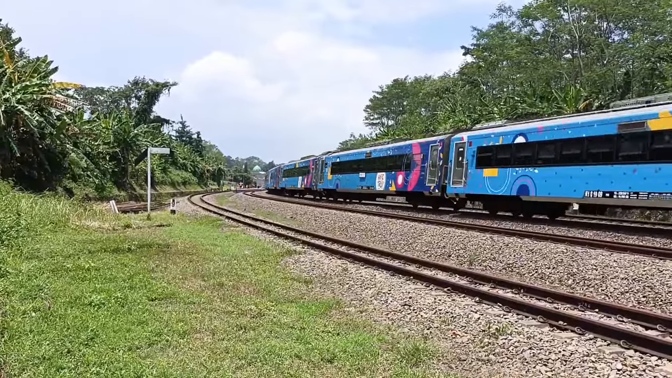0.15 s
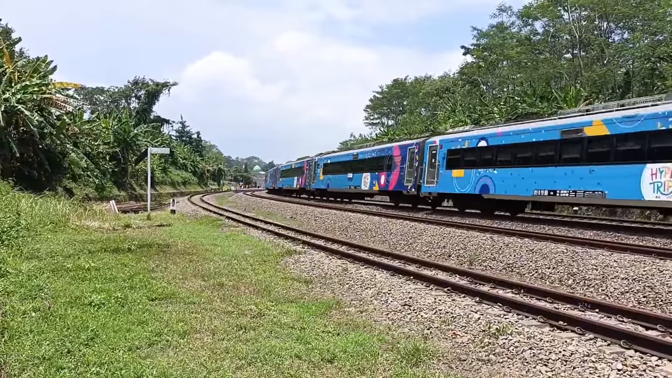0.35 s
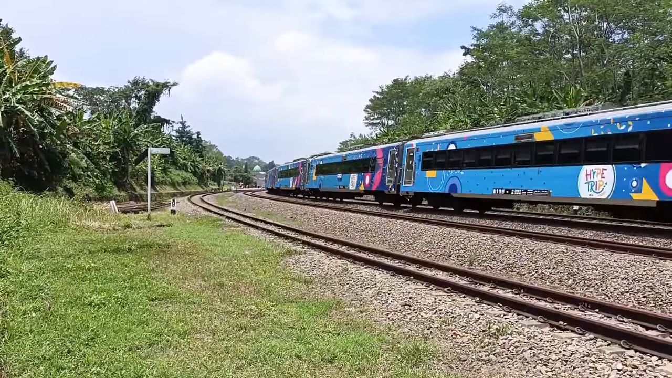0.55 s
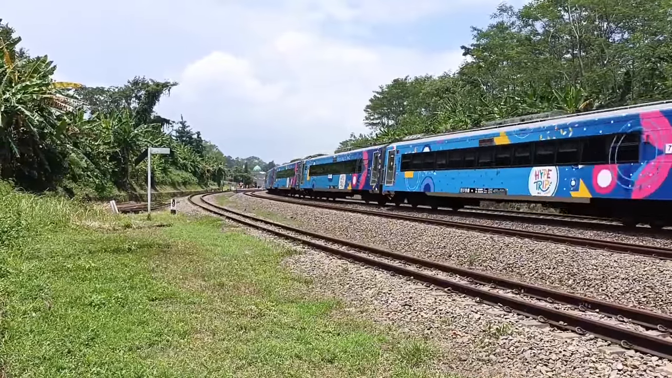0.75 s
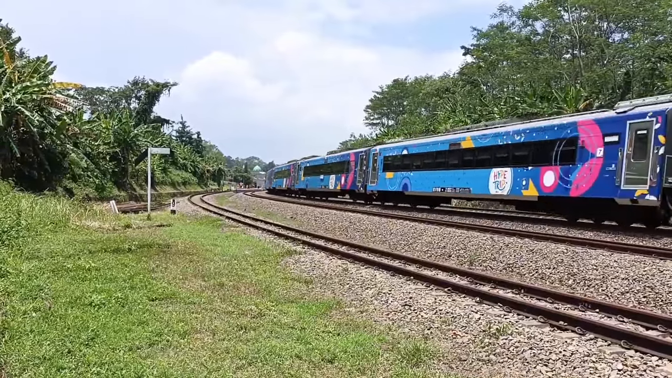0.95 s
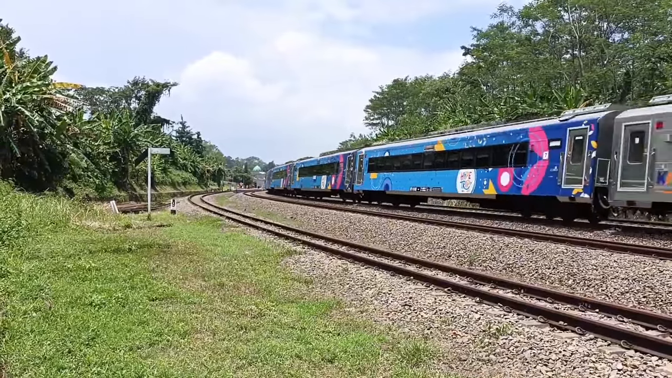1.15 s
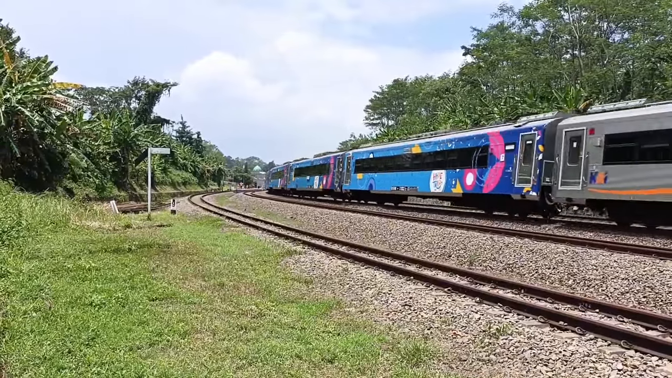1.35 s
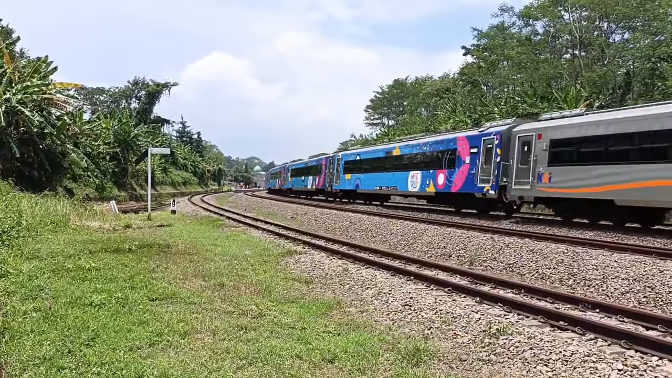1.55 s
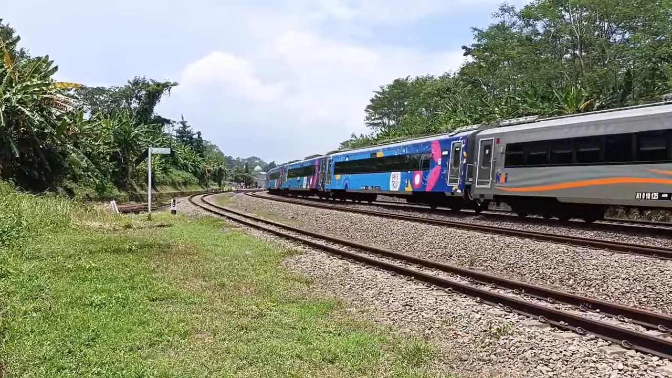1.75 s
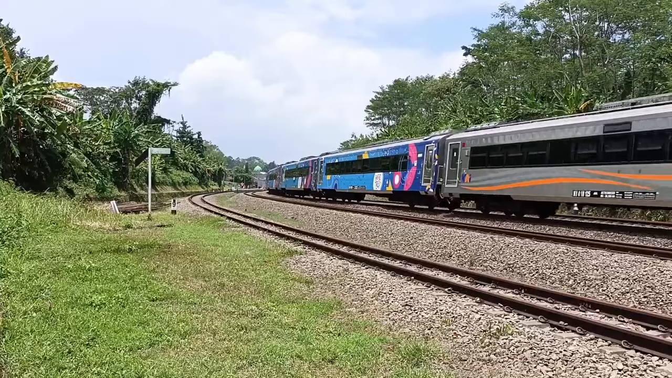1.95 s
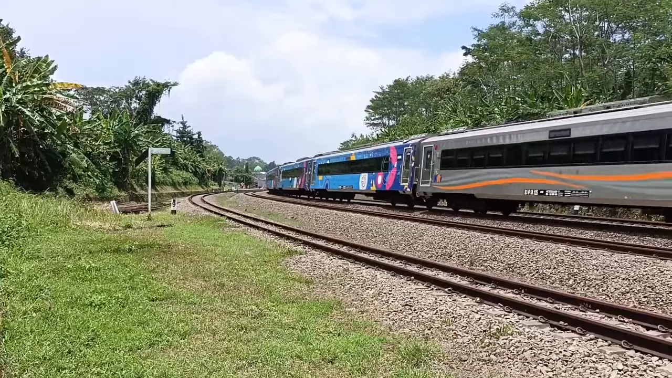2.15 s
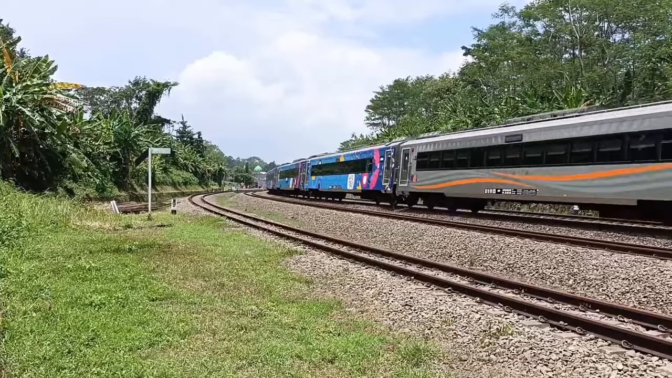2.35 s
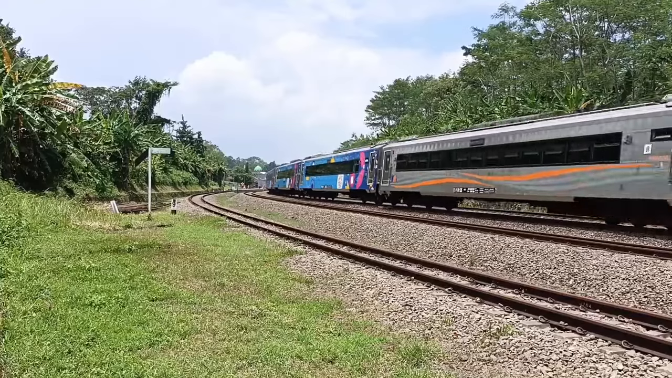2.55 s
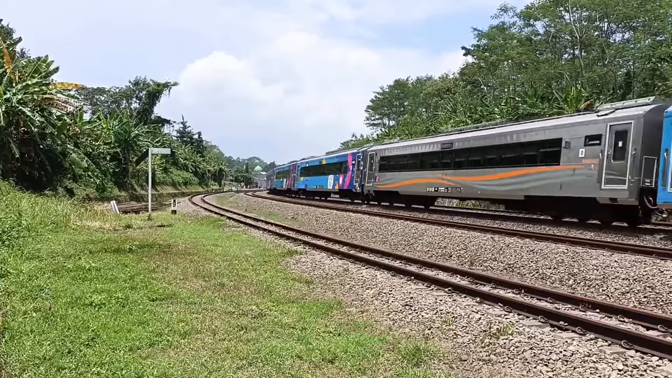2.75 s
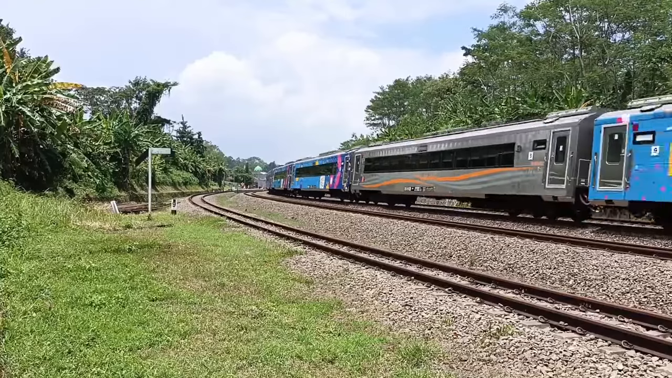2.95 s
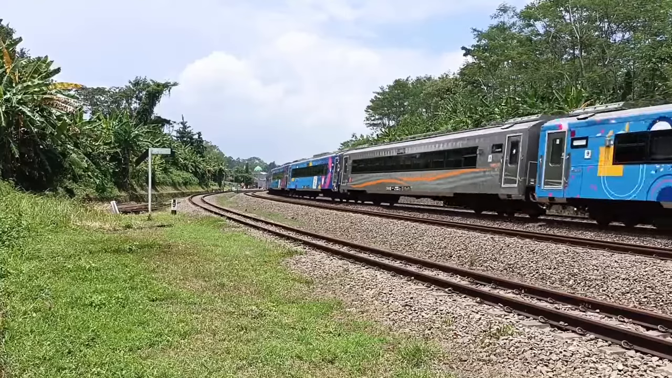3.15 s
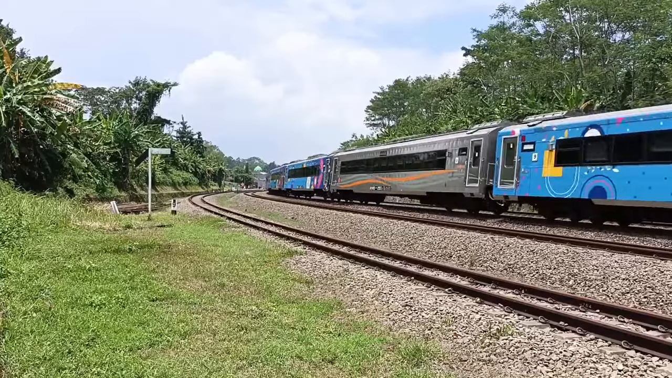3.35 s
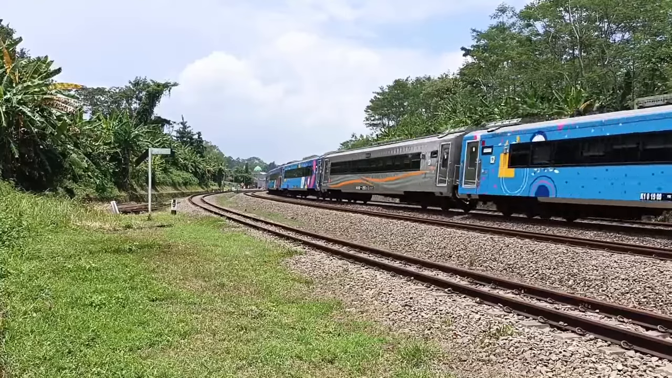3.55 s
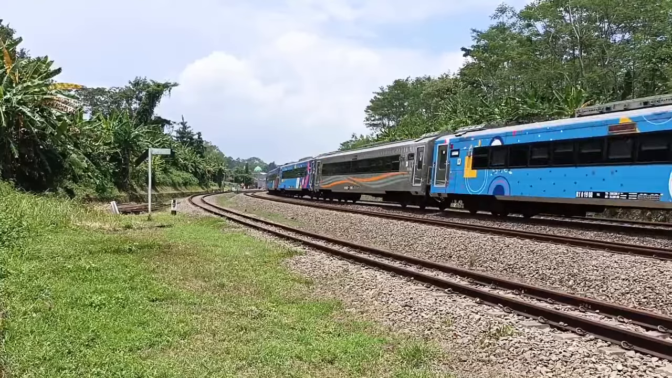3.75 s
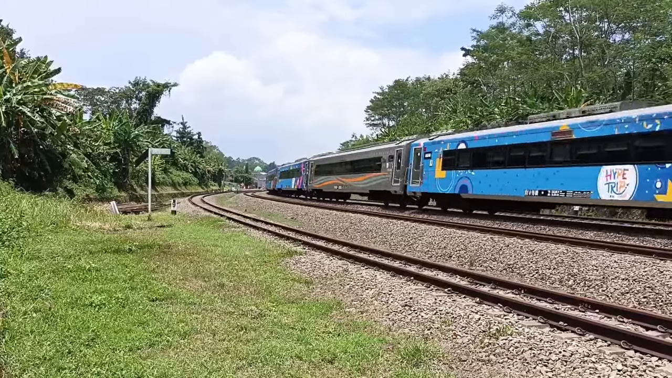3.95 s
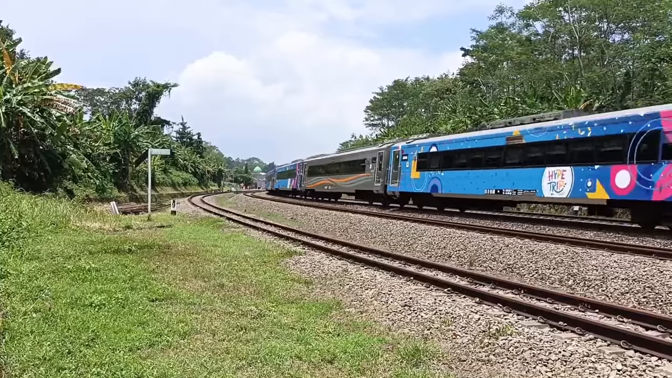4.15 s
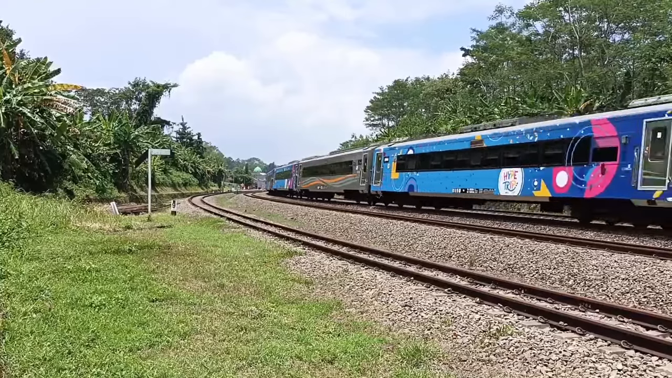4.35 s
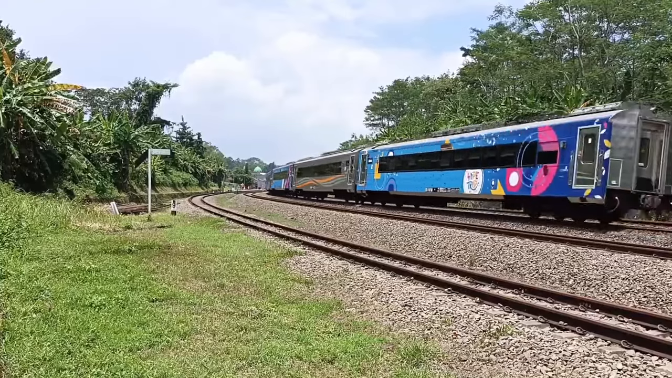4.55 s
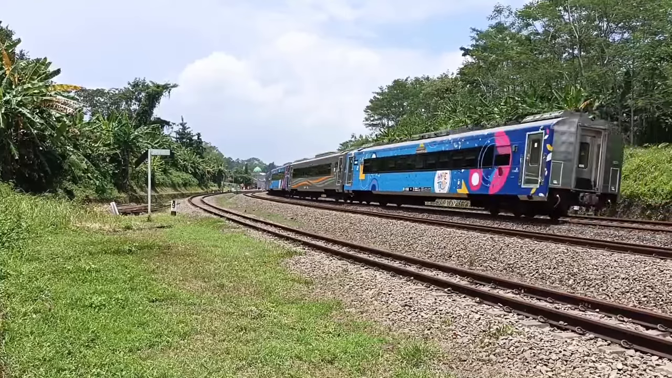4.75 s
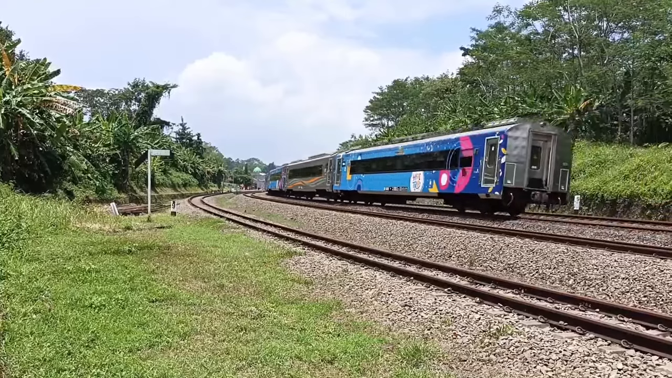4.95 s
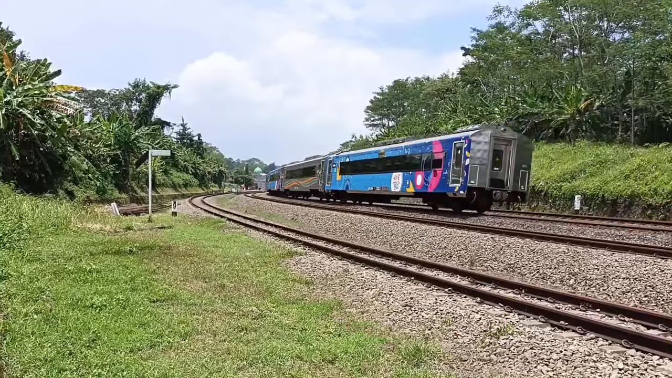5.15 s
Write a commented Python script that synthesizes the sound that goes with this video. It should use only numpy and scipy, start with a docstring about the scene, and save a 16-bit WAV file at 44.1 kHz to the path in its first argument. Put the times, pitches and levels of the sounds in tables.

```python
"""The last coaches of a passenger train roll away round a curve in open country.
First comes a jolting rumble with slack gear knocking; axles, two to a bogie, then clack over a joint.
Flanges hiss and bite, and a high squeal starts strong over a departing wheel's cry.
Mid-way a near squeal slides down in pitch, a wheel rings in bursts and flanges whistle.
At the end the last bogie's roar swells and sinks while the fluttering squeal thins out."""
import sys
import numpy as np
from scipy import signal
from scipy.fft import rfft, irfft
from scipy.io import wavfile
from scipy.ndimage import uniform_filter1d, minimum_filter1d, map_coordinates

SR = 44100
rng = np.random.default_rng(int(sys.argv[2]) if len(sys.argv) > 2 else 0)


def unload_wav(signal):
    """Save mono or channel-first audio to the path in sys.argv[1] as 16-bit WAV at rate SR, clipped to [-1, 1]."""
    wavfile.write(
        sys.argv[1],
        SR,
        np.round(np.clip(np.atleast_2d(signal).T, -1, 1) * 32767).astype(np.int16),
    )


N = 228800

# Rolling, loudest as bogies pass: t/s, rumble level/dB, rail roar level/dB
ROLLING_LEVELS = [(0, -28, -35.5), (0.17, -20.5, -25), (0.6, -19, -20.5), (1.0, -25, -32.5),
                  (1.3, -25.5, -28), (1.52, -20.5, -27.5), (1.78, -27.5, -38), (2.1, -26, -33.5),
                  (2.32, -29, -40), (2.52, -27, -37.5), (2.88, -24.5, -33.5), (3.1, -24.5, -29),
                  (3.45, -29, -38), (3.62, -37.5, -50.5), (3.88, -36, -47), (4.08, -38, -46),
                  (4.18, -33, -38.5), (4.8, -32.5, -40), (5.01, -45, -44.5)]
# Colour of the rumble: f/Hz, density/(dB per Hz)
RUMBLE_COLOUR = [(30, -61), (70, -34), (95, -5), (125, -1), (175, -5.5), (245, 1.5), (300, -3.5),
                 (360, -2.5), (430, -15.5), (1200, -108)]
# Colour of the rail roar: f/Hz, density/(dB per Hz)
ROAR_COLOUR = [(300, -45), (430, -3), (570, 2), (690, -3.5), (900, -6), (1200, -11), (4000, -31)]
# Falling pitch of the rail roar: t/s, pitch ratio
ROAR_DOPPLER = [(0, 1.02), (5.19, .94)]
# The last bogie, heard from behind: t/s, level/dB
REAR_LEVEL = [(4.05, -43.5), (4.22, -37), (4.62, -32), (4.9, -39.5), (5.01, -60)]
# Its colour: f/Hz, density/(dB per Hz)
REAR_COLOUR = [(300, -27), (410, -3), (530, 5.5), (680, -12.5), (1120, -14.5), (1400, -4.5), (1700, -21),
               (2200, -9), (2800, -31)]

# Colour of loose gear and grit: f/Hz, density/(dB per Hz)
RATTLE_COLOUR = [(400, -6), (750, -6), (1120, 0), (1400, 4.5), (2500, -1.5), (3700, -7.5), (5000, -18.5),
                 (9000, -33)]
RATTLE_DB, RATTLE_FOLLOWS = 2.5, 1.253   # level/dB at a roar of 0 dB, share of the roar's dB swing
# Taps per second over all parts, their spread either way/dB, ring time to -60 dB/s
RATTLE_PER_S, RATTLE_SPREAD_DB, RATTLE_T60_S = 260, 5, .045

# Axles drop into a joint: t/s, sleeper thump level/dB, bogie boom level/dB, rail clank level/dB
AXLE_DROPS = [(0.447, -6.5, -11, -10.5), (0.622, -12, -12.5, -19), (1.035, -31, -36, -21.5),
              (1.214, -28, -12.5, -17.5), (1.888, -41, -17.5, -29), (2.068, -31, -23, -31.5),
              (2.204, -16.5, -23.5, -19.5), (2.392, -25, -19, -21.5), (2.782, -13, -14.5, -17),
              (2.963, -44, -16, -20), (3.924, -21.5, -27, -26.5), (4.106, -29, -23.5, -29.5),
              (4.606, -33, -27.5, -35), (5.054, -20.5, -38.5, -35)]
# Modes an axle sets ringing: pitch, wander of the pitch
SLEEPER_HZ, SLEEPER_WANDER_HZ = 122, 24.1
BOGIE_HZ, BOGIE_WANDER_HZ = 252, 37.9
RAIL_HZ, RAIL_WANDER_HZ = 570, 36
# Higher rail modes, against the lowest one: f/Hz, level/dB
UPPER_RAIL_MODES = [(1050, -3), (1470, -7)]
# Dull crunch of the ballast: f/Hz, density/(dB per Hz)
THUD_COLOUR = [(30, -46), (65, -50), (110, 11.5), (260, 1.5), (350, 8.5), (1000, -25)]
# Loose steel at the joint: f/Hz, density/(dB per Hz)
CLATTER_COLOUR = [(200, -35), (400, 3), (680, 2), (1070, -4), (1800, -4.5), (2100, -2.5), (7000, -35)]
THUD_DB, CLATTER_DB = -5.5, 2   # crunch against the tone it joins; loose steel against the lowest rail mode
LANDING_S, LANDING_DB = .017, -1   # delay and level of the landing on the next rail end, against the drop
HITS_THINNED_BELOW_HZ = 89   # thumps and knocks are thinned below this pitch
# Dull knocks of springs and couplers: t/s, level/dB
KNOCKS = [(0.032, -17), (0.135, -13), (0.247, -13.5), (0.512, -11), (.722, -19), (1.487, -19), (2.737, -25),
          (2.852, -36)]

# Flange hiss before HISS_DB is added: t/s, level/dB
GRIND_LEVEL = [(0, -39), (0.25, -48), (0.6, -31.5), (1.0, -39), (1.35, -30), (2.15, -34), (3.25, -31.5),
               (4.05, -37), (4.33, -32), (5.19, -32)]
# Colour of the hiss: f/Hz, density/(dB per Hz)
HISS_COLOUR = [(2400, -8), (3900, 6), (4500, -6), (5000, -2), (7250, -1), (8500, -1), (9800, 10.5),
               (11400, 0.5), (13300, 12)]
# Resonances of the wheel discs: f/Hz, relative level/dB
WHEEL_BODY_MODES = [(1390, -5), (1720, -1.5), (2100, 6), (2520, -4.5), (3070, -4), (3680, -6.5),
                    (3970, -8.5)]
# A flange bites: peak t/s, wheel body level/dB, hiss level/dB, time to half power/s
FLANGE_BITES = [(1.59, -27, -21, 0.047), (1.83, -32.5, -21.5, 0.012), (2.61, -28, -20, 0.022),
                (3.15, -37, -24, 0.07), (3.40, -33, -23.5, 0.063), (3.79, -39.5, -27.5, 0.081),
                (4.331, -33, -24, 0.01), (4.508, -30.5, -46, 0.023), (4.77, -31, -28.5, 0.044)]
HISS_DB, WHEEL_WIDTH_HZ = 5, 125
BODY_DB, BODY_FOLLOWS = -13.5, 0.62   # level/dB at a roar of 0 dB, share of the roar's dB swing

# High squeal before UPPER_DB and LOWER_DB are added: t/s, upper modes level/dB, lower modes level/dB
SQUEAL_LEVELS = [(0, -22, -18), (0.4, -17, -27), (0.9, -15.5, -14.5), (1.65, -23, -29), (2.0, -26, -19),
                 (2.8, -23, -42), (3.25, -24, -24), (3.98, -36, -33), (4.5, -32, -27), (5.19, -40, -30)]
# Upper wheel modes: f/Hz, width/Hz, relative level/dB
UPPER_MODES = [(15385, 8, 0), (15565, 14, -10), (15480, 170, -9)]
# Lower wheel modes: f/Hz, width/Hz, relative level/dB
LOWER_MODES = [(14388, 12, 3), (14567, 10, -11), (14350, 170, -1)]
# The upper modes flare up: peak t/s, level/dB, time to half power/s
UPPER_FLARES = [(.31, -14, 0.014), (2.31, -14, 0.045), (3.26, -10, 0.03)]
# Colour of the sizzle: f/Hz, density/(dB per Hz)
SIZZLE_COLOUR = [(12000, -28), (13750, -10), (14080, 0), (14800, 0), (15400, 6), (15720, 6), (15900, -8)]
UPPER_DB, LOWER_DB, SIZZLE_DB = 9, 3, -33.5

# A squealing wheel passes and its pitch falls: t/s, f/Hz
PASSING_PITCH = [(1.1, 15810), (1.72, 15630), (2.49, 15309), (3.0, 15150), (3.7, 15020)]
PASSING_S, PASSING_DB, PASSING_HALF_S = 2.16, -9, 0.45   # peak t/s, level/dB, time to half power/s
# A wheel that has already gone by: t/s, f/Hz, level/dB
LEAVING_WHEEL = [(0, 14390, -18), (.65, 14120, -35), (1.3, 14030, -30.5), (3.1, 14015, -41)]

# The ringing wheel: f/Hz, width/Hz, relative level/dB
RING_MODES = [(3031, 10, 0), (3025, 90, -4.5)]
# It binds and sings harder: peak t/s, level/dB, time to half power/s
RING_BINDS = [(1.96, -30, 0.055), (2.411, -25, 0.022), (2.585, -22, 0.024), (2.69, -29.5, 0.012),
              (2.93, -31, 0.0067), (3.04, -26.5, 0.039)]
# Its bending pitch: t/s, pitch ratio
RING_DOPPLER = [(1.75, 1.016), (2.02, 1.005), (2.17, 1.017), (2.55, .999)]
RING_S, RING_DB, RING_HALF_S = 2.6, -33, 0.43   # peak t/s, level/dB, time to half power/s
RING_WAVER, RING_FLUTTER_DB = .0027, 2   # share of its pitch; swing of its level/dB

# Flange whistles and rougher cries: start t/s, end t/s, f/Hz, width/Hz, peak level/dB
WHISTLES = [(1.25, 1.5, 9815, 10, -33), (1.5, 2.08, 10362, 14, -36), (2.45, 3.4, 2030, 36, -32.5),
            (2.59, 2.68, 2930, 30, -31), (3.1, 3.28, 3975, 25, -39), (3.68, 3.86, 2950, 220, -39),
            (3.0, 5.4, 13263, 14, -38)]
WHISTLE_WAVER_HZ = 14

# Likeness of the two ears: f/Hz, left-right correlation
LIKENESS = [(60, 1), (550, 0.9), (1200, 0.3), (8000, 0.033)]
# Lead of the left ear: t/s, lead/samples
LEFT_LEAD = [(2, 19), (3, 14), (4.2, 13), (5.19, 5)]
TRACK_LEAD = 0.85   # share of that lead for track noise, which comes from further along the line
# Colour of each microphone port: f/Hz, left level/dB, right level/dB
PORT_COLOUR = [(720, 0.5, 0.5), (1170, -5, -0.5), (2480, 0, -1), (3660, 0.5, 6), (4980, 8, 3),
               (7590, 4.5, 8), (10100, 3.5, -20), (14000, 1, -8)]
CUTOFF_HZ = 15780


def rolling():
    """Rough treads shake sleepers and rails in uneven jolts; the last bogie's roar swells late."""
    rumble_db, roar_db = in_time(ROLLING_LEVELS)
    jolts_db = 2 * drift(rate_hz=18)
    rumble = shaken(RUMBLE_COLOUR) * from_db(rumble_db + jolts_db)
    roar = patchy(bent_pitch(shaken(ROAR_COLOUR), ROAR_DOPPLER), depth_db=3.5)
    roar = roar * from_db(roar_db + jolts_db / 2)
    rear_db = in_time(REAR_LEVEL)[0] + jolts_db / 2
    rear = patchy(rattled(REAR_COLOUR), depth_db=2) * from_db(rear_db)
    return rumble + roar + rear


def rattle():
    """Loose brake gear and grit under the treads give the roar a coarse grain."""
    roar_db = in_time(ROLLING_LEVELS)[1]
    return rattled(RATTLE_COLOUR) * from_db(RATTLE_DB + RATTLE_FOLLOWS * roar_db)


def joint():
    """Each axle drops and lands: sleeper thumps, bogie booms, rail clanks, loose steel clatters."""
    s, thump_db, boom_db, clank_db = np.transpose(AXLE_DROPS)
    thump = wavering(SLEEPER_HZ, SLEEPER_WANDER_HZ) * blows(s, thump_db, rise_s=0.018, t60=0.093)
    bogie = wavering(BOGIE_HZ, BOGIE_WANDER_HZ) + from_db(THUD_DB) * shaken(THUD_COLOUR)
    boom = bogie * blows(s, boom_db, rise_s=0.009, t60=0.3)
    rail = wavering(RAIL_HZ, RAIL_WANDER_HZ)
    for hz, db in UPPER_RAIL_MODES:
        rail = rail + from_db(db) * wavering(hz, RAIL_WANDER_HZ)
    steel = rail + from_db(CLATTER_DB) * rattled(CLATTER_COLOUR)
    strike_s = np.r_[s, s + LANDING_S]
    strike_db = np.r_[clank_db, clank_db + LANDING_DB]
    return thump + boom + steel * blows(strike_s, strike_db, rise_s=0.011, t60=0.12)


def knocks():
    """Slack running gear bumps with a short, low note."""
    s, db = np.transpose(KNOCKS)
    note = wavering(SLEEPER_HZ, SLEEPER_WANDER_HZ) + from_db(THUD_DB) * shaken(THUD_COLOUR)
    return note * blows(s, db, rise_s=0.014, t60=0.034)


def flanges():
    """Flanges rub the outer rail and bite now and then; the wheel discs colour the scrape."""
    roar_db, hiss_db = in_time(ROLLING_LEVELS)[1], in_time(GRIND_LEVEL)[0]
    s, bite_body_db, bite_hiss_db, half_s = np.transpose(FLANGE_BITES)
    body_level = with_swells(from_db(BODY_DB + BODY_FOLLOWS * roar_db), zip(s, bite_body_db, half_s))
    hiss_level = with_swells(from_db(HISS_DB + hiss_db), zip(s, bite_hiss_db, half_s))
    chatter_db = drift(rate_hz=20)
    discs = rubbed([(hz, WHEEL_WIDTH_HZ, db) for hz, db in WHEEL_BODY_MODES])
    body = patchy(discs, depth_db=3.0) * body_level * from_db(1.63 * chatter_db)
    hiss = patchy(shaken(HISS_COLOUR), depth_db=4.0) * hiss_level * from_db(chatter_db)
    return body + hiss


def near_wheels():
    """One squealing wheel swells and fades as it passes; another is already leaving."""
    passing = passing_wheel(in_time(PASSING_PITCH)[0]) * swell(PASSING_S, PASSING_DB, PASSING_HALF_S)
    leaving_hz, leaving_db = in_time(LEAVING_WHEEL)
    return passing + passing_wheel(leaving_hz) * from_db(leaving_db)


def passing_wheel(hz):
    """A squeal follows a pitch curve; its paths off ballast and coach interfere and flutter."""
    carrier = np.exp(2j * np.pi * np.cumsum(hz) / SR)
    paths = np.array([drift(rate_hz=26) + 1j * drift(rate_hz=26) for path in range(3)])
    ears = paths[0] + paths[1:] / 2   # one path shared, one more for each ear
    throb_db = 2 * drift(rate_hz=9)
    return rms_one((ears * carrier).real * from_db(throb_db))


def ringing_wheel():
    """One wheel rings in a low mode as it goes by, wavering, in bursts where it binds in the curve."""
    flutter = rms_one(from_db(RING_FLUTTER_DB * drift(rate_hz=22)))
    level = with_swells(swell(RING_S, RING_DB, RING_HALF_S), RING_BINDS) * flutter
    ring = squealing(RING_MODES, steadiness=0.65)
    return bent_pitch(ring, RING_DOPPLER, RING_WAVER * drift(rate_hz=14)) * level


def whistles():
    """A flange catches and one wheel mode swells, wavers and fades."""
    out = 0
    for start, end, hz, width, db in WHISTLES:
        progress = np.clip((np.arange(N) / SR - start) / (end - start), 0, 1)
        waver = np.exp(2j * np.pi * np.cumsum(WHISTLE_WAVER_HZ * drift(rate_hz=20)) / SR)
        steady = squealing([(hz, width, 0)], steadiness=.7)
        tone = (signal.hilbert(steady) * waver).real   # slides every partial by the same Hz
        out = out + tone * from_db(db) * np.sin(np.pi * progress)
    return out


def squeal():
    """Wheels far along the curve sing at steady pitches in their highest modes, over a fine sizzle."""
    upper_db, lower_db = in_time(SQUEAL_LEVELS)
    upper_level = with_swells(from_db(upper_db + UPPER_DB), UPPER_FLARES)
    upper = squealing(UPPER_MODES, steadiness=0.6) * upper_level
    lower = squealing(LOWER_MODES, steadiness=0.59) * from_db(lower_db + LOWER_DB)
    flicker_db = drift(rate_hz=20)
    sizzle = patchy(shaken(SIZZLE_COLOUR), depth_db=3) * from_db(SIZZLE_DB + flicker_db)
    return upper + lower + sizzle


def shaken(spectrum):
    """A heavily damped body shaken by rough contact: coloured noise of unit power."""
    return stereo_noise(from_db(in_hz(spectrum)[0]), in_hz(LIKENESS)[0])


def rubbed(modes):
    """Narrow steel modes fed by friction: resonant noise of unit power."""
    power = 0
    for hz, width, db in modes:
        power = power + from_db(db) ** 2 / width / (1 + ((bins() - hz) / width) ** 2) ** 2
    return stereo_noise(np.sqrt(power), in_hz(LIKENESS)[0])


def squealing(modes, steadiness):
    """Stick-slip holds the modes near a limiting amplitude, so their level is evened out."""
    x = rubbed(modes)
    power = uniform_filter1d(x ** 2, SR // 20, axis=-1) + 1e-6
    return rms_one(x / power ** (np.clip(steadiness, 0, 1) / 2))


def rattled(spectrum, count=8):
    """Several loose parts tap at random, each with a short ring of its own."""
    age = np.arange(SR // 20) / SR
    hits = rng.random((count, N)) < RATTLE_PER_S / count / SR
    taps = hits * from_db(RATTLE_SPREAD_DB * rng.uniform(-1, 1, (count, N)))
    decay = np.exp(-np.log(1000) * age / RATTLE_T60_S)
    rings = rfft(rng.standard_normal((2, count, len(age))) * decay, N)
    mid, side = np.sum(rings * rfft(taps), axis=1)
    ears = to_ears(mid, side, in_hz(LIKENESS)[0])
    return rms_one(irfft(ears * from_db(in_hz(spectrum)[0]), N))


def wavering(hz, wander_hz):
    """A loaded mode whose pitch never holds still; unit power."""
    pitch = hz + wander_hz * drift(rate_hz=60)
    return rms_one(np.sin(2 * np.pi * (np.cumsum(pitch) / SR + rng.random())))


def stereo_noise(gain, likeness):
    """Random vibration with the given colour, partly alike in both ears."""
    mid, side = rfft(rng.standard_normal((2, N)))
    return rms_one(irfft(gain * to_ears(mid, side, likeness), N))


def to_ears(mid, side, likeness):
    """Two independent spectra blend into left and right ears of the given likeness."""
    alike = np.clip(likeness, -1, 1)
    return np.sqrt(1 + alike) * mid + np.sqrt(1 - alike) * side * [[1], [-1]]


def patchy(x, depth_db):
    """Many contacts come and go, so each pitch region swells and sinks on its own."""
    cells = signal.stft(x, nperseg=512)[2]
    chance = rng.standard_normal(cells.shape[1:])
    across_pitch = uniform_filter1d(chance, size=4, axis=0)
    patches = uniform_filter1d(across_pitch, size=9, axis=1)   # smoothed along time
    return rms_one(signal.istft(cells * from_db(depth_db * rms_one(patches)))[1][:, :N])


def bent_pitch(x, doppler, waver=0):
    """Motion shifts the pitch: the sound is read faster or slower by the given ratio."""
    read = np.cumsum(in_time(doppler)[0] + waver)
    return np.array([map_coordinates(ear, [read], order=3, mode="wrap") for ear in x])


def blows(times, levels_db, rise_s, t60):
    """Envelope of blows that swell and die away, adding in power."""
    t, power = np.arange(N) / SR, np.zeros(N)
    for s, db in zip(times, levels_db):
        at = slice(max(int(s * SR), 0), int((s + .5) * SR))
        age = np.maximum(t[at] - s, 0)
        rise = np.minimum(age / rise_s, 1)
        decay = np.exp(-np.log(1000) * np.maximum(age - rise_s, 0) / t60)
        power[at] += (rise * from_db(db) * decay) ** 2
    return np.sqrt(power)


def swell(peak_s, db, half_s):
    """Envelope of a sound that grows and fades evenly about its peak."""
    away = np.minimum(np.abs(np.arange(N) / SR - peak_s) / half_s, 10)
    return from_db(db) * np.exp2(-away ** 2 / 2)


def with_swells(steady, rows):
    """Short swells add their power to a given envelope."""
    return np.sqrt(steady ** 2 + sum(swell(s, db, half_s) ** 2 for s, db, half_s in rows))


def drift(rate_hz):
    """Slow chance with a spread of about 1, its faster motion damped above the rate."""
    count = N // 25   # drawn coarsely, then joined by straight lines
    hz = np.arange(count // 2 + 1) * SR / N
    slow = irfft(rfft(rng.standard_normal(count)) / (1 + (hz / rate_hz) ** 2), count)
    return np.interp(np.linspace(0, count - 1, N), np.arange(count), rms_one(slow))


def from_db(db):
    """Decibels to gain."""
    return 10 ** (np.asarray(db) / 20)


def rms_one(x):
    """Scale to unit power."""
    return x / np.sqrt(np.mean(x ** 2) + 1e-20)


def in_time(rows):
    """The columns of a curve at every sample."""
    s, *columns = np.transpose(rows)
    return [np.interp(np.arange(N) / SR, s, c) for c in columns]


def bins():
    """Frequency of each spectral bin, at least 1 Hz."""
    return np.maximum(np.arange(N // 2 + 1) * SR / N, 1)


def in_hz(rows):
    """The columns of a spectrum at every bin, joined along log frequency."""
    hz, *columns = np.transpose(rows)
    return [np.interp(np.log(bins()), np.log(hz), c) for c in columns]


def from_the_side(x, lead):
    """Sound reaches the left microphone first, so the right one is delayed."""
    right = map_coordinates(x[1], [np.arange(N) - lead], order=5, mode="nearest")
    return np.array([x[0], right])


def scene():
    """Track and wheel noise; both move toward the middle as the train recedes."""
    lead = in_time(LEFT_LEAD)[0]
    low_cut = signal.butter(2, HITS_THINNED_BELOW_HZ, "high", fs=SR, output="sos")
    hits = signal.sosfilt(low_cut, joint() + knocks())
    track = rolling() + rattle() + hits
    wheels = flanges() + near_wheels() + ringing_wheel() + whistles() + squeal()
    return from_the_side(track, TRACK_LEAD * lead) + from_the_side(wheels, lead)


def record(dry):
    """Each microphone port has its own colour; a limiter holds the peaks and the top is cut."""
    heard = irfft(rfft(dry) * from_db(in_hz(PORT_COLOUR)), N)
    headroom = 1 / np.maximum(np.abs(heard).max(axis=0), 1)
    limited = heard * uniform_filter1d(minimum_filter1d(headroom, size=441), size=441)
    top_cut = signal.ellip(14, .1, 80, CUTOFF_HZ, fs=SR, output="sos")
    return signal.sosfilt(top_cut, limited)


dry = scene()
out = record(dry)
unload_wav(out)
```